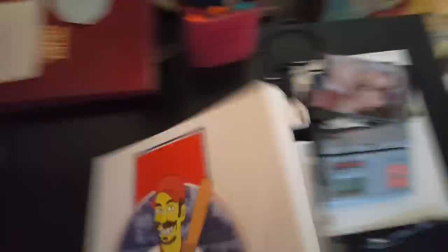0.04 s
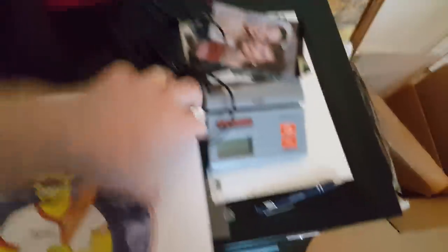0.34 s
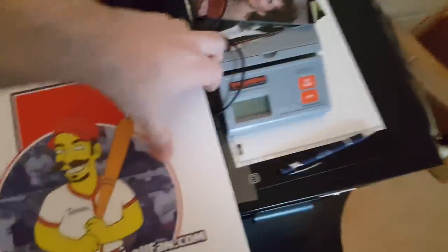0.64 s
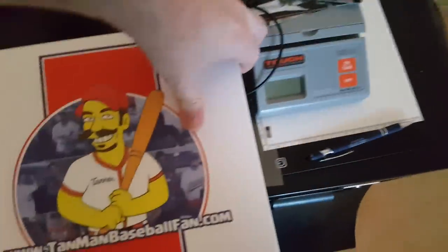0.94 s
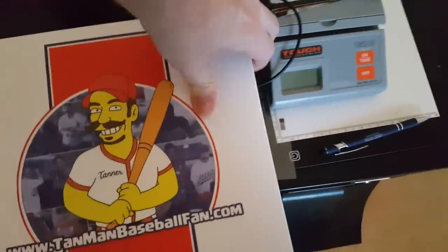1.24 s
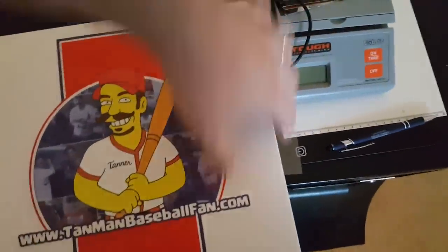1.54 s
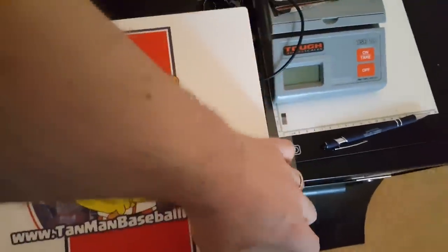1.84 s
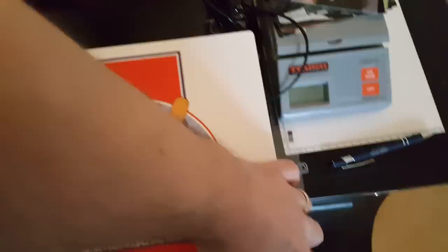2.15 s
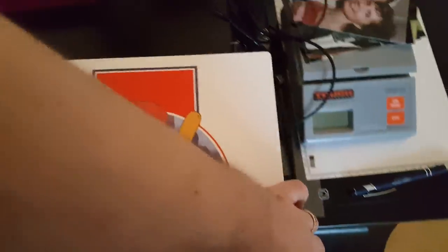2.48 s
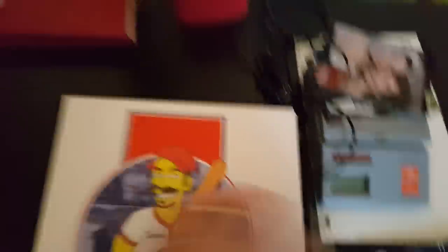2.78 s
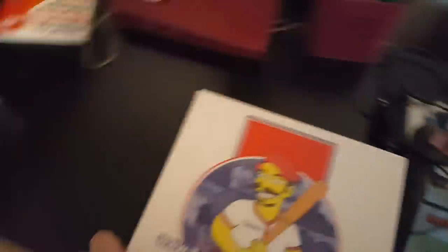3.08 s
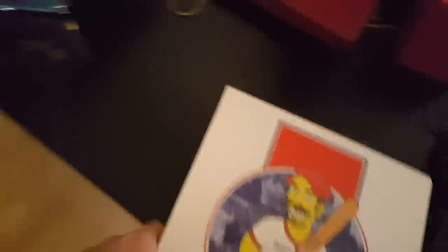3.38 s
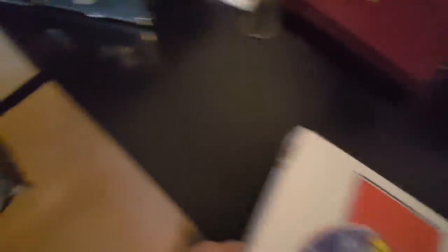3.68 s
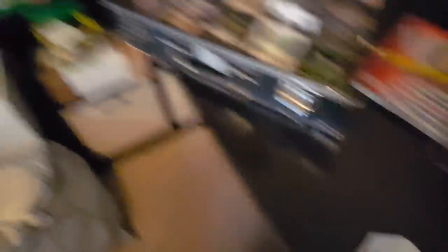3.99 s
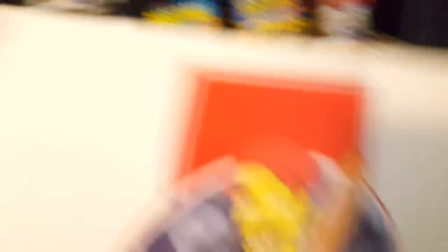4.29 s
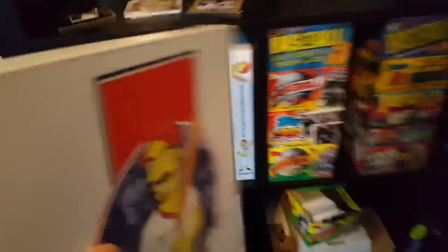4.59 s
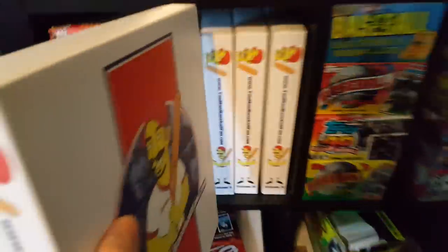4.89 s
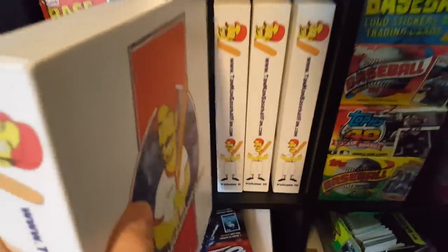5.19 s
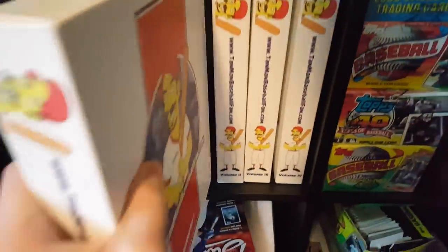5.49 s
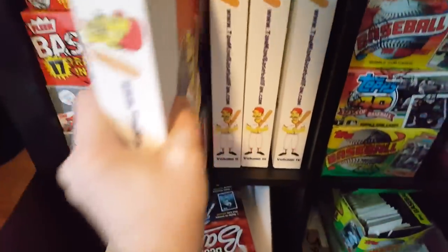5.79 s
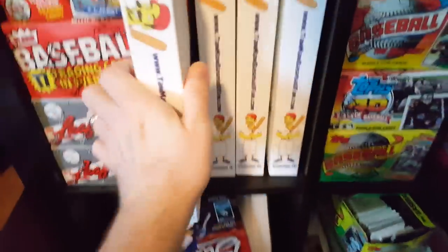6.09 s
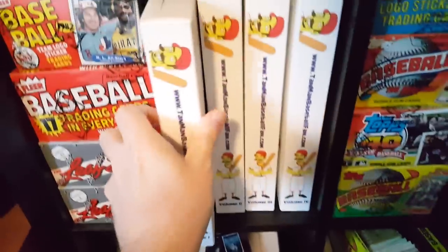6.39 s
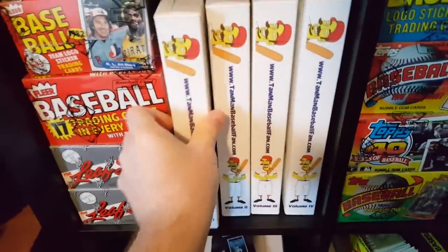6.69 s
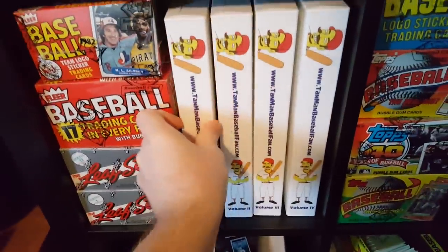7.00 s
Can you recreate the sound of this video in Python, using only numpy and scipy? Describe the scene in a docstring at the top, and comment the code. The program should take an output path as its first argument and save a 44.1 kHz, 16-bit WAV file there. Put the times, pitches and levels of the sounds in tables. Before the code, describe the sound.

Close to a hand-held microphone in a small furnished room, stiff binder covers clack and thump on a desk, loudest in the first half. The binder is then dragged briefly across the wood and carried with a soft rustle of cloth and some clatter. It knocks against a shelf and is pushed in with a hissing, juddering scrape, ending in a couple of lighter knocks over a faint room hum.

```python
"""Clacks and thuds: a thick plastic-covered binder is put down on a desk and gripped.
It is dragged off, carried with a swish of sleeve and pushed into a shelf between others.
Stiff edges chatter, flat covers flex and thump, cover and wood hiss and judder as they rub.
A small furnished room answers over its own murmur; a hand-held camera adds a few soft bumps."""
import sys
import numpy as np
from scipy import signal
from scipy.fft import rfft, irfft, next_fast_len
from scipy.io import wavfile
from scipy.ndimage import uniform_filter1d

SR = 44100
rng = np.random.default_rng(int(sys.argv[2]) if len(sys.argv) > 2 else 0)


def output_pcm(signal):
    """Save a mono or channel-first signal as 16-bit PCM at the path in sys.argv[1].

    Samples are clipped to [-1, 1] before scaling.
    """
    pcm = np.clip(np.atleast_2d(signal).T, -1, 1) * 32767
    wavfile.write(sys.argv[1], SR, np.round(pcm).astype(np.int16))


N = 310464


def amp(db):
    """Decibels to gain."""
    return 10 ** (np.asarray(db) / 20)


def unit_rms(x):
    """Scales to rms 1."""
    return x / np.sqrt(np.mean(x ** 2) + 1e-20)


def lookup(table, hz):
    """Interpolates a table on a log-frequency axis."""
    freq_hz, value = np.transpose(table)
    return np.interp(np.log(hz + 1), np.log(freq_hz), value)


def add(mix, start_s, sound):
    """Lays a sound into the stereo mix."""
    part = mix[:, max(round(start_s * SR), 0):][:, :sound.shape[-1]]
    part += sound[..., :part.shape[1]]


def colour(x, spectrum, size=2048):
    """Minimum-phase filter with the given spectrum."""
    log_gain = np.log(amp(lookup(spectrum, abs(np.fft.fftfreq(size, 1 / SR)))))
    taps = np.fft.ifft(np.exp(np.conj(signal.hilbert(log_gain)))).real
    return signal.fftconvolve(x, taps[None], axes=1)[:, :x.shape[1]]


def low_cut(x, hz):
    """Third-order high-pass: small panels radiate little deep bass."""
    return signal.lfilter(*signal.butter(3, hz, "high", fs=SR), x)


def correlate(x, coherence):
    """Gives two independent channels the tabled coherence."""
    left, other = rfft(x)
    shared = lookup(coherence, np.fft.rfftfreq(x.shape[1], 1 / SR))
    right = shared * left + np.sqrt(1 - shared ** 2) * other
    return irfft([left, right], x.shape[1])


def place(x, bearing):
    """Delays the far microphone; bearing runs from -1 (left) to 1 (right)."""
    lag_s = .00024 * bearing * np.array([[1], [-1]])
    hz = np.fft.rfftfreq(x.shape[1], 1 / SR)
    return irfft(rfft(x) * np.exp(-2j * np.pi * hz * lag_s), x.shape[1])


def panel_pulse(cycles, peak_cycles):
    """A heavily damped panel swells until peak_cycles, then dies quickly."""
    age = cycles / peak_cycles
    return age * np.exp(1 - age) * np.sin(2 * np.pi * cycles)


def stroke(start_s, level_db, hold_s, rise_s, fall_s, bend=1):
    """Envelope, full from start_s; rise and fall span 20 dB; bend rounds the shoulders."""
    t = np.arange(N) / SR - start_s
    away = np.maximum(-t, 0) / rise_s + np.maximum(t - hold_s, 0) / fall_s
    return amp(level_db) * 10 ** -np.minimum(away ** bend, 10)


# Still-room spectrum: freq_hz, gain_db
AIR_SPECTRUM = [(20, -11.5), (35, -26.5), (70, -8), (130, -11.5), (300, -16.5), (450, -24), (1000, -30.5),
                (1700, -28), (3600, -33), (5500, -35.5), (7500, -40.5), (10000, -46), (13000, -41.5),
                (16000, -41.5)]
# Diffuse sound, left against right: freq_hz, coherence
DIFFUSE_COHERENCE = [(30, 0.86), (120, 0.88), (300, 0.97), (700, 0.68), (1400, 0.12), (5000, .05)]

def air(level_db=-63.2):
    """Steady room murmur and microphone hiss."""
    noise = correlate(rng.standard_normal((2, N)), DIFFUSE_COHERENCE)
    return amp(level_db) * unit_rms(colour(noise, AIR_SPECTRUM))


# Tail decay: freq_hz, t60_s
ROOM_DECAY = [(120, .3), (320, 0.18), (840, 0.25), (2200, 0.26), (6000, .21), (14000, 0.082)]
# Tail spectrum: freq_hz, gain_db
ROOM_SPECTRUM = [(100, -2.5), (300, 3.8), (800, -1.5), (3000, -1.5), (6000, 3), (12000, 5)]
# Echoes off desk top, shelves and walls: delay_s, gain
ROOM_ECHOES = [(.0045, 0.44), (.0092, .2), (0.017, .16), (.0255, .14), (.051, 0.035)]

def room(x, tail_db=-7, build_s=.0013, size=256):
    """A few near echoes and a dense tail whose bands die at their own rates."""
    hz, t, bands = signal.stft(rng.standard_normal((2, SR // 2)), SR, nperseg=size)
    decay = np.exp(-np.log(1000) * t / lookup(ROOM_DECAY, hz)[:, None])
    tail = signal.istft(bands * decay, SR, nperseg=size)[1]
    build_up = 1 - np.exp(-np.arange(tail.shape[1]) / (build_s * SR))
    tail = correlate(tail, DIFFUSE_COHERENCE) * build_up
    response = amp(tail_db) * colour(tail / np.linalg.norm(tail[0]), ROOM_SPECTRUM)
    for delay_s, gain in ROOM_ECHOES:
        arrival_s = delay_s + rng.uniform(-.0002, .0002, 2)
        response[[0, 1], np.round(arrival_s * SR).astype(int)] += gain
    return signal.fftconvolve(x, response, axes=1)[:, :N]


# Microphone port balance: freq_hz, left_minus_right_db
PORT_BALANCE = [(400, -0.1), (1200, 1), (1750, 4), (2500, 0), (3100, 0.5), (3600, -2), (4200, -8),
                (5400, -7.5), (7000, -4), (8500, 1), (15000, -1)]

def microphone_ports(x):
    """The two ports ring at different pitches; their summed power gain stays flat."""
    side_db = lookup(PORT_BALANCE, np.fft.rfftfreq(N, 1 / SR))
    gain = amp([side_db / 2, -side_db / 2])
    gain /= np.sqrt(np.mean(gain ** 2, 0))
    return irfft(rfft(x) * gain, N)


# Bumps on the camera body: start_s, level_db, pitch_hz, left_minus_right_db
CAMERA_BUMPS = [(0.268, -52, 109, 25), (0.537, -50.5, 97, 25), (0.576, -46.5, 69, 18), (3.073, -37, 115, 4),
                (3.648, -43, 126, 16), (4.434, -35.5, 125, 6), (4.506, -40, 122, 3), (5.084, -39.5, 108, 1),
                (5.74, -41, 90, 0)]

def camera_bumps():
    """Soft low pushes reach the microphones through the camera body."""
    out, t = np.zeros((2, N)), np.arange(SR // 5) / SR
    for start_s, level_db, pitch_hz, side_db in CAMERA_BUMPS:
        gain = amp([[level_db + side_db / 2], [level_db - side_db / 2]])
        add(out, start_s, gain * panel_pulse(pitch_hz * t, peak_cycles=.53))
    return low_cut(out, hz=40)


# Near contact, left against right: freq_hz, coherence
CONTACT_COHERENCE = [(100, 0.51), (400, 1), (1200, 0.4), (4000, 0.23), (12000, 0.9)]

def friction(envelope, spectrum, grain_db, clump_db, bearing, clump_samples=220):
    """A hail of tiny slips of uneven size, clumped as the surfaces catch."""
    moving = np.flatnonzero(envelope > amp(-100))
    span = slice(moving[0], moving[0] + next_fast_len(moving[-1] - moving[0]))
    slips = rng.standard_normal((2, N))[:, span]
    slips *= amp(grain_db * np.minimum(rng.exponential(1, N)[span], 6))
    catching = uniform_filter1d(rng.standard_normal(N)[span], clump_samples)
    catching = unit_rms(uniform_filter1d(catching, clump_samples))
    clumped = correlate(slips, CONTACT_COHERENCE) * amp(clump_db * catching)
    hiss = unit_rms(colour(clumped, spectrum))
    out = np.zeros((2, N))
    out[:, span] = envelope[span] * place(hiss, bearing)
    return out


# Whistle envelope: start_s, level_db, hold_s, rise_s, fall_s
WHISTLE_ENVELOPE = (1.4, -68, .12, .03, .02)
# Narrow noise band: freq_hz, gain_db
WHISTLE_SPECTRUM = [(1100, -60), (1600, -11.5), (1710, 0), (1820, -13), (2600, -60)]

def faint_whistle():
    """A faint, brief whistling tone near 1.7 kHz."""
    return friction(stroke(*WHISTLE_ENVELOPE), WHISTLE_SPECTRUM, grain_db=-2.5, clump_db=1, bearing=0)


# Arm swings: peak_s, hiss_db, fizz_db
SLEEVE_SWINGS = [(4.11, -58.5, -75), (4.41, -53.5, -59)]
# Cloth hiss: freq_hz, gain_db
SLEEVE_SPECTRUM = [(100, -2), (220, -1.5), (570, -9), (1500, -11.5), (4200, -14), (8000, -23), (12000, -55)]
# Friction fizz of cloth or squeezed covers: freq_hz, gain_db
FIZZ_SPECTRUM = [(4000, -14), (8000, 14), (12000, 9), (16000, 11)]

def sleeve(rise_s=.36, fall_s=.28, fizz_share=.42):
    """Cloth hisses through each swing of the arm and fizzes at its fastest."""
    swing, fastest = np.zeros((2, N))
    for peak_s, hiss_db, fizz_db in SLEEVE_SWINGS:
        swing += stroke(peak_s, hiss_db, 0, rise_s, fall_s)
        fastest += stroke(peak_s, fizz_db, 0, fizz_share * rise_s, fizz_share * fall_s)
    hiss = friction(swing, SLEEVE_SPECTRUM, grain_db=3.5, clump_db=1.2, bearing=-.6)
    fizz = friction(fastest, FIZZ_SPECTRUM, grain_db=0, clump_db=2.5, bearing=-.503)
    return hiss + fizz


# Light hand strokes: peak_s, level_db, swell_s
BRUSH_STROKES = [(0.12, -59, .08), (0.235, -49.5, .07), (0.42, -51, .11), (1.47, -66, .2),
                 (2.35, -58.5, .24), (2.93, -70, .25)]
# Hand on cover: freq_hz, gain_db
BRUSH_SPECTRUM = [(150, -25), (330, 4.5), (800, 3), (1700, -3.5), (4000, -11), (9000, -29), (14000, -45)]
# Finger slip: start_s, level_db, hold_s, rise_s, fall_s
SQUEAK_STROKE = (0.092, -46, .01, .036, .025)
# Plastic squeak: freq_hz, gain_db
SQUEAK_SPECTRUM = [(400, -8.5), (1150, -5.5), (1350, 4), (1600, -8), (2250, -15), (2700, -9), (3300, -19),
                   (4200, -10.5), (9000, -40)]

def hands():
    """Hands brush over the cover; the plastic squeaks under the fingers."""
    brushing = sum(stroke(peak_s, db, 0, swell_s, swell_s) for peak_s, db, swell_s in BRUSH_STROKES)
    brush = friction(brushing, BRUSH_SPECTRUM, grain_db=-1, clump_db=3, bearing=-.15)
    squeak = friction(stroke(*SQUEAK_STROKE), SQUEAK_SPECTRUM, grain_db=2, clump_db=1.5, bearing=-.086)
    return brush + squeak


# Ticks as the binder is lined up: start_s, level_db, pitch_hz
PLASTIC_TICKS = [(5.573, -45.5, 5200), (5.667, -55.5, 5590)]

def plastic_ticks():
    """Plastic touches plastic in tiny high pulses."""
    out, t = np.zeros((2, N)), np.arange(SR // 20) / SR
    for start_s, level_db, pitch_hz in PLASTIC_TICKS:
        add(out, start_s, amp(level_db) * panel_pulse(pitch_hz * t, peak_cycles=1.8))
    return out


# Two pulls over the desk: start_s, level_db, hold_s
DESK_PULLS = [(3.245, -53.3, .41), (3.79, -51, .18)]
# Cover on wood: freq_hz, gain_db
DRAG_SPECTRUM = [(260, -41), (450, 4.5), (884, 1.5), (1840, -1.5), (2730, -7), (2990, -10), (4060, -11),
                 (10100, -32), (15000, -49)]
# Desk-top boom: freq_hz, gain_db
DESK_SPECTRUM = [(60, -24), (150, -3), (290, 6.5), (420, -7), (700, -1), (1300, -51.5)]
# Edge leaving the rim: start_s, level_db, hold_s, rise_s, fall_s
RASP_STROKE = (3.926, -33.5, .004, .011, .06)
# Edge on rim: freq_hz, gain_db
RASP_SPECTRUM = [(300, -10), (870, 3.5), (1600, 1.5), (2750, 1.5), (4100, -10), (8000, -24.5), (10000, -41),
                 (15000, -39)]

def desk_drag(overhang_s=3.45, judder_db=3.8, judder_rise_db_per_s=50):
    """The binder hisses over the desk, shakes it more as its weight nears the rim, and rasps off."""
    pull = sum(stroke(*row, rise_s=.1, fall_s=.1) for row in DESK_PULLS)
    to_rim_s = np.maximum(overhang_s - np.arange(N) / SR, 0)
    shaking = pull * amp(judder_db - judder_rise_db_per_s * to_rim_s)
    hiss = friction(pull, DRAG_SPECTRUM, grain_db=3, clump_db=1.4, bearing=.058)
    judder = friction(shaking, DESK_SPECTRUM, grain_db=4, clump_db=2.5, bearing=.047)
    rasp = friction(stroke(*RASP_STROKE), RASP_SPECTRUM, grain_db=1.5, clump_db=.6, bearing=.45)
    return hiss + judder + rasp


# Pushes into the shelf: start_s, level_db, hold_s, rise_s, fall_s
SHELF_PUSHES = [(5.739, -41.5, .075, .003, .01), (5.825, -54.5, .045, .01, .01),
                (5.875, -40.8, .19, .004, .158), (6.425, -53.8, .085, .08, .105),
                (6.72, -62.5, .01, .08, .28)]
# Cover on cover: freq_hz, gain_db
PUSH_SPECTRUM = [(300, -29), (480, -9), (800, -4), (1080, -3.5), (1350, 0), (2050, -4), (2450, 0),
                 (2750, 3), (3450, -3.5), (4100, 2), (4700, -2), (8000, -18), (9800, -49), (12200, -25),
                 (16000, -38)]
# Shelf-board boom: freq_hz, gain_db
SHELF_SPECTRUM = [(60, -32), (135, 1), (200, 5.5), (255, -2), (345, 3), (480, -10), (700, -0.5),
                  (1200, -33.5)]

def shelf_push():
    """Cover hisses on cover, brighter when squeezed, while the shelf board judders."""
    tightest_s, squeeze_width_s, squeeze_db = 6.1, .1, -16
    firm_push_db, judder_db, judder_db_per_db, lag_s = -41, -47.5, .72, .022
    t = np.arange(N) / SR
    push = sum(stroke(*row, bend=2) for row in SHELF_PUSHES)
    squeeze = amp(squeeze_db) * np.exp(-((t - tightest_s) / squeeze_width_s) ** 2)
    drive = (push / amp(firm_push_db)) ** judder_db_per_db
    pole = np.exp(-1 / (lag_s * SR))  # the board is slow to start and stop
    shaking = amp(judder_db) * signal.lfilter([1 - pole], [1, -pole], drive)
    hiss = friction(push, PUSH_SPECTRUM, grain_db=3, clump_db=.9, bearing=-.05)
    fizz = friction(push * squeeze, FIZZ_SPECTRUM, grain_db=3, clump_db=2, bearing=-.043)
    judder = friction(shaking, SHELF_SPECTRUM, grain_db=3.5, clump_db=3.5, bearing=-.28)
    return hiss + fizz + judder


# Binder and furniture modes: pitch_hz, gain_db, t60_s
BODY_MODES = [(125.5, 6, .22), (166.8, 4, 0.06), (300, -7, 0.112), (399.3, 1, .4), (590, -7, .25),
              (849, 2.5, 0.06), (967.4, 3.5, 0.4), (1279, 3.5, 0.087), (1835, 0.5, 0.35), (2843, 0, 0.12)]

def body_ringing(knocks):
    """Each mode picks up the part of a knock that lies at its pitch."""
    t = np.arange(SR // 2) / SR
    response = np.zeros_like(t)
    for pitch_hz, gain_db, t60_s in BODY_MODES:
        decay_per_s = np.log(1000) / t60_s
        mode = np.exp(-decay_per_s * t) * np.sin(2 * np.pi * pitch_hz * t)
        response += amp(gain_db) * 2 * decay_per_s / SR * mode
    return signal.fftconvolve(knocks, response[None], axes=1)[:, :N]


# Binder blows: start_s, thump_db, thump_hz, crack_db, cutoff_hz, contact_s
BINDER_KNOCKS = [ (0.198, -37, 600, -29, 4000, .013), (0.258, -21.5, 590, -12, 5100, .007),
                 (0.385, -32.5, 540, -26, 3000, .004), (0.392, -25, 1480, -14.5, 3060, .0016),
                 (0.449, -34.5, 560, -37, 3000, .006), (0.611, -32, 738, -22.5, 3250, .0027),
                 (0.822, -36.5, 680, -21, 2500, .009), (1.2683, -14.5, 830, 2.5, 4240, .001),
                 (1.285, -31, 190, -19, 2000, .006), (1.534, -39, 409, -23.5, 2330, .002),
                 (1.7663, -14, 900, -2, 2100, .0021), (2.020, -32.5, 580, -29.5, 4490, .0027),
                 (2.116, -42, 500, -25.5, 7000, .015), (2.24, -41, 300, -21.5, 10900, .006),
                 (2.3814, -11, 323, -16, 1350, .0057), (2.499, -22, 920, -4.5, 3850, .0025),
                 (2.7486, -24, 930, -15.5, 3200, .0068), (3.0675, -20.5, 420, -22, 8200, .02),
                 (3.084, -21.5, 275, -20, 1470, .022), (3.4826, -15.5, 345, -18, 1500, .0042),
                 (3.541, -26, 910, -13, 3830, .004), (3.555, -19, 355, -35, 1500, .003),
                 (3.650, -25, 225, -21.5, 2460, .008), (3.78, -25.5, 262, -30, 4060, .022),
                 (3.891, -27.5, 278, -18.5, 2000, .006), (4.119, -44, 220, -26.5, 3550, .007),
                 (4.278, -48.5, 192, -25, 2930, .002), (4.411, -35, 290, -15.3, 5100, .011),
                 (4.456, -32.5, 322, -10.5, 3000, .0014), (4.575, -48, 330, -32, 4000, .006),
                 (4.798, -46.5, 266, -32.5, 6200, .017), (5.046, -42, 258, -27.5, 7000, .003),
                 (5.088, -23, 290, -10, 3600, .014), (5.739, -25, 334, -12.5, 4040, .0076),
                 (5.991, -21.5, 1484, -28, 2460, .003), (6.019, -27, 242, -38, 3000, .006),
                 (6.277, -37, 520, -25.5, 3300, .0025), (6.525, -30, 605, -18.5, 2020, .009),
                 (6.536, -30, 248, -21.5, 1300, .0046), ]
# Hard edge contact: freq_hz, gain_db
CRACK_SPECTRUM = [(100, -35), (300, -5.5), (700, 1), (1300, 2.5), (2000, -1.5), (2800, -1.5), (3250, -6),
                  (4100, -5), (5200, -9), (8000, -14), (9700, -26.5), (15000, -21)]
# Binder direction as the camera turns: time_s, bearing
BINDER_PATH = [(2.0, .04), (3.07, -.35), (3.6, .2), (4.41, -.7), (4.8, -.65), (5.09, .75), (5.74, -.25)]

def binder_knocks(peak_cycles=.46, grit=.97, seating_share=.09, size=8192):
    """Each blow flexes the cover (thump), chatters its edge (crack) and jolts the whole binder (thud)."""
    thud_delay_s, thud_re_crack_db, thud_hz = .0013, -28, 350
    out = np.zeros((2, N))
    t = np.maximum(np.arange(size) - 16, 0) / SR  # 16 samples of lead for the stereo lag
    first_touch = 4 * (np.cumsum(t > 0) == 1)  # one-sample impulse
    for start_s, thump_db, thump_hz, crack_db, cutoff_hz, contact_s in BINDER_KNOCKS:
        chatter = correlate(rng.standard_normal((2, size)), CONTACT_COHERENCE) * np.exp(-t / contact_s)
        chatter *= 1 - np.exp(-t / (seating_share * contact_s))  # glancing contacts seat slowly
        crack = colour(grit * chatter + first_touch, CRACK_SPECTRUM)
        crack = signal.lfilter(*signal.butter(2, cutoff_hz, fs=SR), crack)
        crack *= amp(crack_db) / np.linalg.norm(crack.mean(0))
        thump = amp(thump_db) * panel_pulse(thump_hz * t, peak_cycles)
        thud_cycles = thud_hz * np.maximum(t - thud_delay_s, 0)
        thud = amp(crack_db + thud_re_crack_db) * panel_pulse(thud_cycles, peak_cycles)
        bearing = np.interp(start_s, *np.transpose(BINDER_PATH))
        add(out, start_s, place(crack + thump + thud, bearing))
    return low_cut(out, hz=105)


def scene():
    """Knocks fill the room; the rubbing, whistle and ticks are drier."""
    knocks = binder_knocks()
    knocks += amp(-5.5) * body_ringing(knocks)
    soft = hands() + faint_whistle() + desk_drag() + sleeve() + shelf_push() + plastic_ticks()
    reflected = room(knocks + amp(-6.5) * soft)
    airborne = knocks + amp(1.6) * soft + reflected + air()
    return microphone_ports(airborne) + camera_bumps()


def record(dry, cutoff_hz=15800):
    """Steep low-pass band limit."""
    taps = signal.firwin(511, cutoff_hz, window=("kaiser", 9), fs=SR)
    return signal.oaconvolve(dry, taps[None], "same")


dry = scene()
out = record(dry)
output_pcm(out)
```